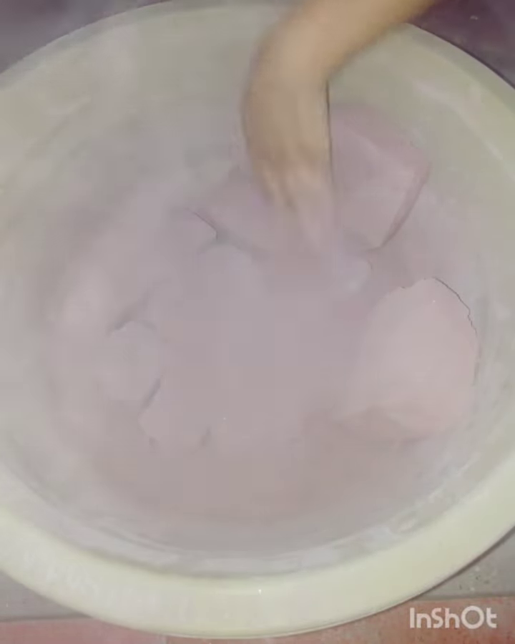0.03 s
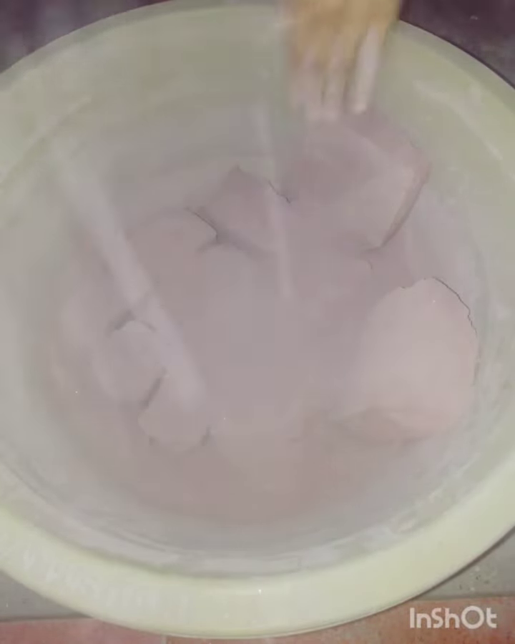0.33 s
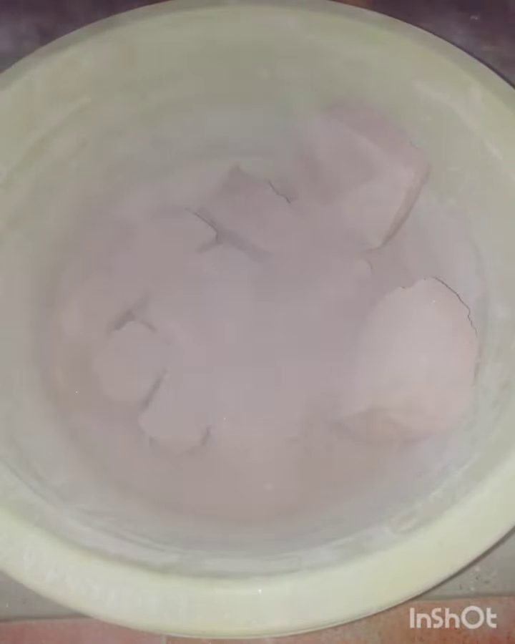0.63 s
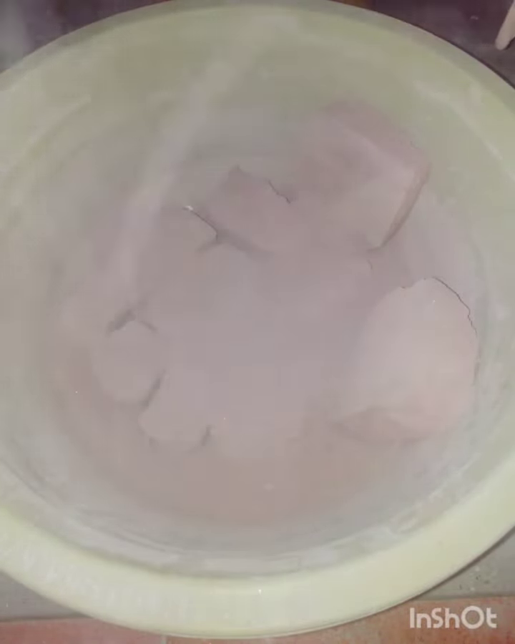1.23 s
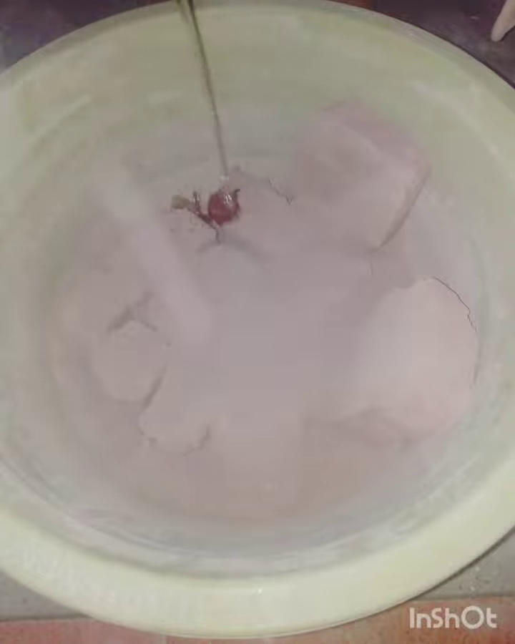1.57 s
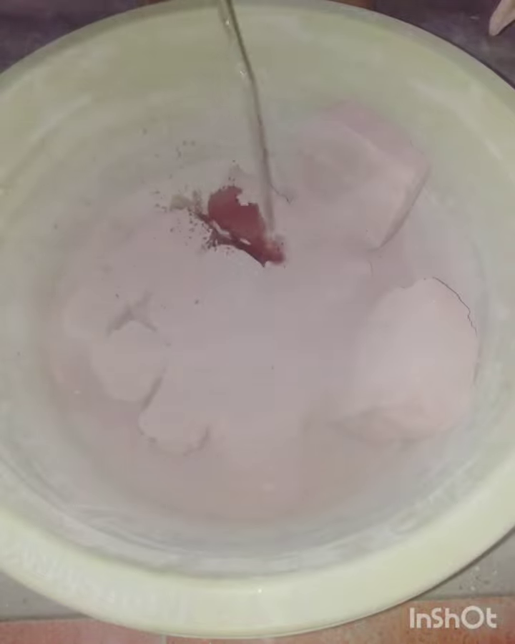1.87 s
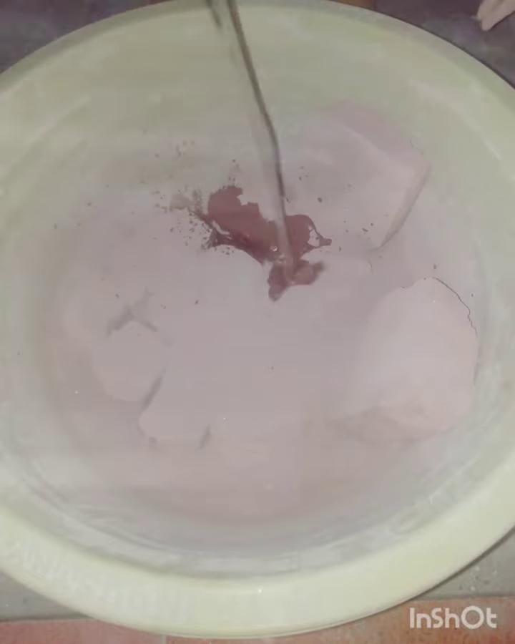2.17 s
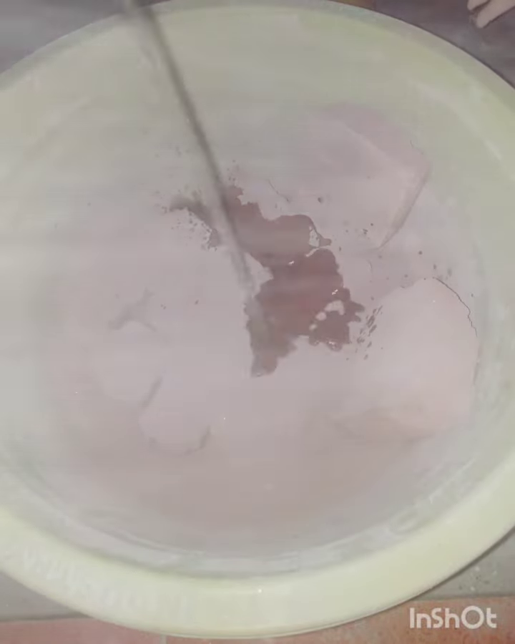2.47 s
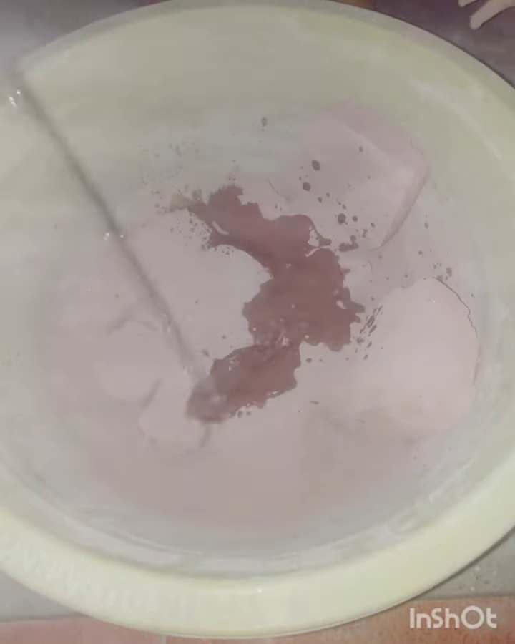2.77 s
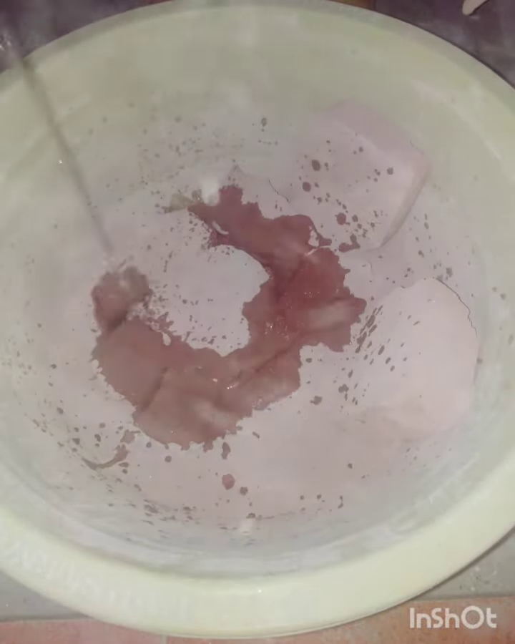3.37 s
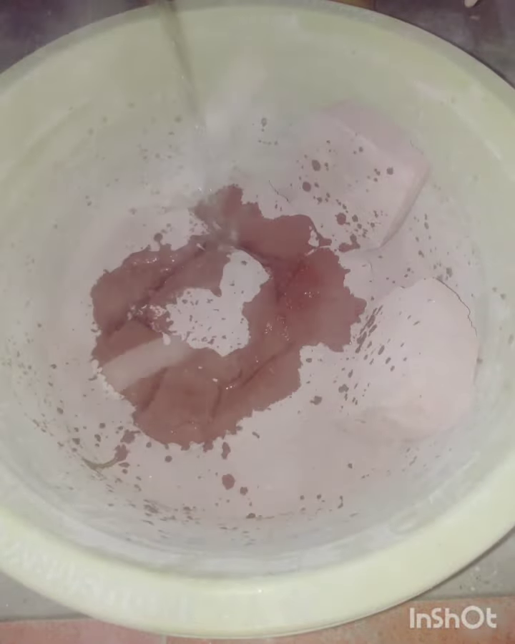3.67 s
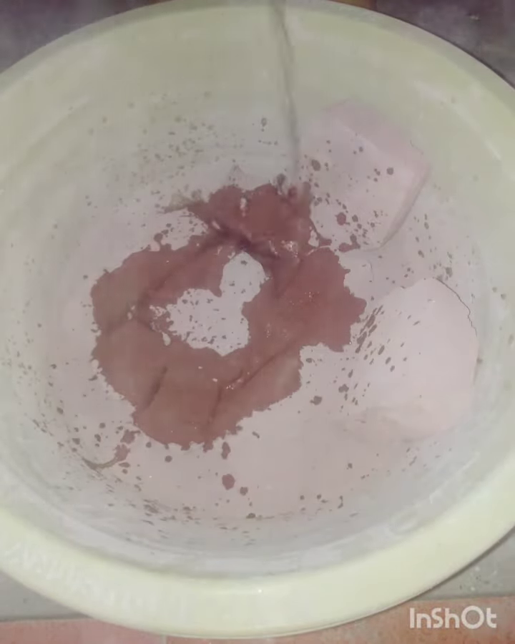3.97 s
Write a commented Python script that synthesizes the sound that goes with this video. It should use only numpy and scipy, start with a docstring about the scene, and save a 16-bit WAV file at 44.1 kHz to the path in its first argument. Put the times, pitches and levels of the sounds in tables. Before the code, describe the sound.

A thin stream of water splatters close by onto dry powder in a plastic tub. A brief brushing and a few light knocks come first, then the pour patters and sputters unevenly over a low room rumble.

```python
"""A room with a steady low rumble; a plastic tub of dry powder stands close to the left microphone port.
Nearby, a hand brushes off powder and a vessel knocks lightly. Then, from about 1.5 s, a thin stream of
water is poured into the tub. It drums dully on the powder, throws a patter of droplets, sputters whenever
it digs into its own puddle and thuds in the heavier gushes. A faint hollow tone passes near the end."""
import sys
import numpy as np
from scipy import signal
from scipy.fft import rfft, irfft, next_fast_len
from scipy.io import wavfile
from scipy.ndimage import map_coordinates

SR = 44100
rng = np.random.default_rng(int(sys.argv[2]) if len(sys.argv) > 2 else 0)


def unload_wav(signal):
    """Save mono or channel-first audio to the path in sys.argv[1] as 16-bit WAV at rate SR, clipped to [-1, 1]."""
    wavfile.write(
        sys.argv[1],
        SR,
        np.round(np.clip(np.atleast_2d(signal).T, -1, 1) * 32767).astype(np.int16),
    )


N = 176400
TOP_HZ = 15950
DROPLET_CYCLES = 6  # a tiny droplet dies away in this many cycles

# How alike diffuse sound is at the two ports: frequency_hz, correlation
PORT_LIKENESS = [(60, 1), (150, 0.91), (300, 0.8), (700, 0.23), (2000, 0), (8000, 0)]
# The room's reverberation: frequency_hz, t60_s
ROOM_DECAY = [(200, 0.088), (2000, 0.32), (6000, 0.25), (14000, 0.15)]


def amp(db):
    return 10 ** (np.asarray(db) / 20)


def unit_rms(x):
    return x / np.sqrt(np.mean(x ** 2) + 1e-20)


def lean_left(x, db):
    """Raise the left channel and lower the right, each by db."""
    return x * amp([[db], [-db]])


def along(points, hz):
    """Read (frequency_hz, value) points on a log frequency axis."""
    point_hz, values = np.transpose(points)
    return np.interp(np.log(hz + 1), np.log(point_hz + 1), values)


def envelope(points):
    """Gain per sample from (time_s, level_db) points, silent before the first."""
    times, db = np.transpose(points)
    return amp(np.interp(np.arange(N) / SR, times, db)) * (np.arange(N) >= times[0] * SR)


def coloured(x, colour, size=16384):
    """Minimum-phase filter through (frequency_hz, gain_db) points."""
    cepstrum = irfft(np.log(amp(along(colour, np.fft.rfftfreq(size, 1 / SR)))))
    cepstrum[1:size // 2] *= 2
    cepstrum[size // 2 + 1:] = 0
    impulse = irfft(np.exp(rfft(cepstrum)))
    return signal.fftconvolve(x, impulse[None, :size // 2], axes=1)[:, :N]


def noise(colour):
    """Coloured stereo noise of rms 1, alike at both ports in the bass and independent in the treble."""
    hz = np.fft.rfftfreq(N, 1 / SR)
    width = np.arccos(np.clip(along(PORT_LIKENESS, hz), -1, 1)) / 2
    spectrum = rfft(rng.standard_normal((2, N))) * amp(along(colour, hz))
    mid, side = irfft(spectrum * [np.cos(width), np.sin(width)], N)
    return unit_rms(np.array([mid + side, mid - side]))


def add(out, start_s, x):
    """Mix x into out from start_s on."""
    i = min(N, max(0, round(start_s * SR)))
    out[:, i:i + x.shape[-1]] += x[..., :N - i]


def pings(starts, hz, gain, cycles, rise=0.013, size=300, lead_s=0.000297):
    """Slightly rising tones that fall 60 dB in so many cycles; each reaches the left port first."""
    right_starts = starts + lead_s * rng.uniform(0.26, 1.66, len(starts))
    ports = []
    for arrival in (starts, right_starts):
        samples = np.ceil(arrival * SR).astype(int)[:, None] + np.arange(size)
        turns = (samples / SR - arrival[:, None]) * hz[:, None]
        shape = (1 - np.exp(-turns)) * 1000 ** (-turns / cycles)
        tones = gain[:, None] * shape * np.sin(2 * np.pi * turns * (1 + rise * turns / cycles / 2))
        ports.append(np.bincount(samples.ravel(), tones.ravel(), N)[:N])
    return np.array(ports)


def grain_gains(count, spread_db):
    """Many small grains and a few large ones."""
    return amp(spread_db * np.minimum(rng.exponential(size=count), 3.5))


def echo(x, decay, stretches):
    """Diffuse reflections, with a fresh tail for each stretch of time as the source moves."""
    out = np.zeros((2, N))
    for k, part in enumerate(np.array_split(x, stretches)):
        hz, t, spectra = signal.stft(rng.standard_normal((2, SR // 4)), SR, nperseg=128)
        tail = signal.istft(spectra * amp(-60 * t / along(decay, hz)[:, None]), SR, nperseg=128)[1]
        tail = np.pad(tail / np.linalg.norm(tail[0]), ((0, 0), (SR // 700, 0)))  # 1.4 ms late
        add(out, k * N / stretches / SR, signal.fftconvolve(part[None], tail, axes=1))
    return out


def room(hum_hz=75.4, hum_db=-46.5, rumble_db=-42.5):
    """The room tone: a low rumble with a faint hum."""
    # Spectrum of the rumble: frequency_hz, gain_db
    rumble_colour = [(15, -66), (25, -34), (59, -4.5), (107, 2), (170, -11.5), (200, -14), (228, -17),
                     (261, -15), (299, -14.5), (352, -27), (437, -21.5), (513, -29.5), (557, -24),
                     (1090, -41), (1180, -39), (1930, -44), (4210, -47.5), (5520, -55.5), (15800, -65)]
    hum = amp(hum_db) * np.sin(2 * np.pi * (hum_hz * np.arange(N) / SR + rng.random()))
    return lean_left(amp(rumble_db) * noise(rumble_colour) + hum, db=0.58)


def vessel_knocks(pivot_hz=2000, clack_t60_s=0.036):
    """Each light knock is a short clack that sets the vessel ringing; the room answers."""
    # Knocks on the vessel: start_s, level_db, tilt_db_per_octave
    knocks = [(.07, -47, 4), (.19, -24.5, 0.5), (1.097, -52, 3.5), (1.304, -35.5, -2), (1.342, -41, -7.5)]
    # The vessel's resonances: pitch_hz, level_db, t60_s
    modes = [(934, 4, 0.15), (1180, -6, 0.15), (1250, -3, .09), (1600, -7, .1), (1900, 5, 0.072),
             (2380, 2, 0.11), (3070, -4, 0.12), (3270, 1, 0.13), (3420, -3, .1), (3740, -8, .1)]
    # Spectrum of the clack: frequency_hz, gain_db
    clack_colour = [(500, -16), (800, -8), (950, -2.5), (1200, 9), (1500, -10.5), (1950, -4), (2300, -10),
                    (2900, -3), (3400, -8), (4000, -8), (6500, -20.5), (8700, -13.5), (10000, -50)]
    out, t = np.zeros((2, N)), np.arange(SR // 4) / SR
    for start, db, tilt in knocks:
        ring = np.zeros((2, len(t)))
        for hz, mode_db, t60 in modes:
            fade = amp(mode_db + tilt * np.log2(hz / pivot_hz) - 60 * t / t60)
            ring += fade * np.sin(2 * np.pi * hz * t + rng.uniform(0, np.pi, (2, 1)))
        tilted = [(hz, gain_db + tilt * np.log2(hz / pivot_hz)) for hz, gain_db in clack_colour]
        clack = unit_rms(coloured(rng.standard_normal((2, len(t))), tilted)[:, :len(t)])
        add(out, start, amp(db - 14) * ring / np.abs(ring).max())
        add(out, start, amp(db - 7 - 60 * t / clack_t60_s) * clack)
    return out + amp(-4) * echo(out[0], ROOM_DECAY, stretches=4)


def handling(tick_s=0.336, tick_db=-47.5, tick_t60_s=0.063):
    """Nearby, a hand brushes off powder; the vessel knocks and gives one small dull tick."""
    # The brushing, sinking to a faint hiss that stays: time_s, level_db
    rub_levels = [(0, -51.5), (.06, -55), (.15, -59), (.3, -63), (.45, -65.5)]
    # Spectrum of the brushing: frequency_hz, gain_db
    rub_colour = [(500, 3.5), (1500, -12), (3500, -11), (8000, -15.5), (10500, -27), (15000, -16.5)]
    # Spectrum of the tick: frequency_hz, gain_db
    tick_colour = [(1100, -30), (1850, 2), (2300, -2), (2900, -22), (9000, -36)]
    out = vessel_knocks() + envelope(rub_levels) * noise(rub_colour)
    t = np.arange(SR // 4) / SR
    add(out, tick_s, amp(tick_db - 60 * t / tick_t60_s) * noise(tick_colour)[:, :len(t)])
    return lean_left(out, db=0.5)


def drumming(slap_count=3000, hiss_db=2):
    """The powder takes the stream with a dull murmur and soft, dense slaps of mud."""
    # The stream drumming on the powder: time_s, level_db
    drum_levels = [(1.47, -67), (1.52, -49), (1.62, -54), (1.9, -49.5), (2.15, -47.5), (2.33, -58),
                   (2.48, -47.5), (2.6, -52.5), (2.7, -52), (2.82, -43.5), (2.9, -51.5), (3.02, -46),
                   (3.3, -56), (3.43, -49), (3.65, -51), (3.77, -45.5), (4.0, -49.5)]
    # Spectrum of the drumming: frequency_hz, gain_db
    drum_colour = [(40, -7), (75, 10.5), (110, 9), (200, 5.5), (280, 6), (500, 0), (800, -4.5), (1400, -20),
                   (4000, -80)]
    # Soft splatter of mud: time_s, level_db
    mud_levels = [(1.48, -66), (1.53, -53), (1.6, -69), (1.95, -63.5), (2.12, -47.5), (2.21, -55.5),
                  (2.3, -68), (2.58, -78), (2.68, -46.5), (2.74, -66), (2.8, -45), (2.87, -75), (3.01, -54),
                  (3.08, -58.5), (3.17, -54), (3.35, -69.5), (3.7, -103), (3.96, -49.5)]
    # Spectrum of the splatter: frequency_hz, gain_db
    mud_colour = [(300, -23.5), (800, -10.5), (1500, -4), (2200, -8), (4000, -3), (9000, -28)]
    starts = rng.uniform(0, N / SR, slap_count)
    hz = rng.uniform(370, 2420, slap_count)
    slaps = pings(starts, hz, grain_gains(slap_count, spread_db=3.5), cycles=6.3)
    mud = unit_rms(unit_rms(coloured(slaps, mud_colour)) + amp(hiss_db) * noise(mud_colour))
    return lean_left(envelope(drum_levels) * noise(drum_colour) + envelope(mud_levels) * mud, db=1)


def blobs(per_s=120, spread_db=2):
    """The stream arrives in uneven blobs: a quickly wavering gain of rms 1."""
    position = np.arange(N) * per_s / SR
    blob_sizes = rng.standard_normal(int(position[-1]) + 4)
    return unit_rms(amp(spread_db * map_coordinates(blob_sizes, [position])))


def patter(per_s=750, pitch_hz=7640, pitch_spread=0.29, puff_s=0.0037):
    """Tiny droplets land at random, each a ping with a short puff of spray."""
    # Fine patter of the stream: time_s, level_db
    patter_levels = [(1.49, -74), (1.52, -51), (1.6, -52), (1.69, -39.5), (1.73, -47.5), (1.81, -42.5),
                     (1.85, -38.5), (2.03, -42.5), (2.25, -41.5), (2.42, -41.5), (2.52, -45), (2.66, -42),
                     (2.79, -45), (2.91, -42.5), (3.0, -47), (3.16, -51.5), (3.27, -72), (3.33, -67.5),
                     (3.39, -51.5), (3.46, -45), (3.7, -45.5), (3.8, -39), (3.9, -46), (4.0, -39.5)]
    count = int(per_s * N / SR)
    starts = rng.uniform(0, N / SR, count)
    gain = grain_gains(count, spread_db=4.3)
    hz = np.minimum(pitch_hz * np.exp(pitch_spread * rng.standard_normal(count)), TOP_HZ)
    impact_energy = np.bincount((starts * SR).astype(int), gain ** 2, N)[:N]
    puff_energy = signal.lfilter([1], [1, -np.exp(-1 / (puff_s * SR))], impact_energy)
    spray = unit_rms(np.sqrt(puff_energy) * rng.standard_normal((2, N)))
    droplets = unit_rms(pings(starts, hz, gain, DROPLET_CYCLES))
    return envelope(patter_levels) * (amp(-2) * droplets + amp(-3.5) * spray)


def drops(fragments=9, splat_s=0.0046, early_share=0.3, puff_rise_s=0.0011, delay_s=0.001005):
    """A big drop rings for a few cycles amid its fragments, with a puff of spray."""
    # Big drops landing: start_s, level_db, pitch_hz
    landings = [(1.564, -22, 8400), (1.6236, -22.5, 8500), (1.666, -28, 7400), (1.6825, -23.5, 5400),
                (1.7034, -28.5, 7750), (1.7844, -26, 7300), (1.8347, -23, 7160), (1.8494, -27, 7200),
                (1.8785, -23.5, 5400), (1.9106, -18.5, 6550), (1.9223, -21, 7750), (1.9321, -17.5, 3540),
                (1.962, -19, 5700), (1.967, -19, 3970), (1.9836, -21.5, 6840), (2.0223, -22.5, 7600),
                (2.035, -25.5, 7320), (2.0464, -22.5, 7640), (2.105, -21, 3540), (2.1247, -19, 4740),
                (2.1486, -18.5, 5120), (2.2643, -19.5, 7130), (2.2754, -38, 7000), (2.425, -31, 7800),
                (2.4506, -23.5, 8060), (2.473, -27.5, 6700), (2.4889, -25, 7460), (2.519, -23.5, 6160),
                (2.5413, -27.5, 4530), (2.591, -24, 7050), (2.6152, -20.5, 4900), (2.6575, -18, 5440),
                (2.732, -18, 6650), (2.7522, -18, 7750), (2.7864, -15.5, 6400), (2.7966, -24, 7240),
                (2.812, -26, 7300), (2.87, -26, 6960), (2.8857, -31, 7300), (2.9062, -24.5, 6950),
                (3.061, -24.5, 4820), (3.1526, -24.5, 7300), (3.1893, -36, 7200), (3.247, -47, 7340),
                (3.2636, -39.5, 7200), (3.4312, -29, 5700), (3.4404, -25, 5430), (3.47, -27.5, 9000),
                (3.529, -33, 8100), (3.5626, -23, 7400), (3.6255, -29, 7100), (3.7383, -17.5, 2960),
                (3.749, -12, 5230), (3.7605, -17, 4290), (3.773, -23, 6250), (3.7915, -17.5, 4660),
                (3.8812, -24.5, 8430), (3.922, -23, 6000)]
    out = np.zeros((2, N))
    puff_age = np.arange(SR // 100) / SR / puff_rise_s
    puff = puff_age * np.exp(1 - puff_age)
    for start, db, hz in landings:
        start = start + delay_s
        offsets = splat_s * ((np.arange(fragments) + rng.random(fragments)) / fragments - early_share)
        fragment_hz = hz * np.exp(0.23 * rng.permutation(np.linspace(-1, 1, fragments)))
        fragment_gain = amp(1.5) * np.exp(-2 * np.abs(offsets) / splat_s)
        splat = pings(start + offsets, fragment_hz, fragment_gain, DROPLET_CYCLES)
        splat += pings(np.array([start]), np.array([hz]), np.ones(1), cycles=16.6, size=600)
        out += amp(db - 7) * splat * np.sqrt(splat_s * SR / np.sum(splat[0] ** 2))
        add(out, start - puff_rise_s, amp(db - 19) * puff * rng.standard_normal((2, len(puff))))
    return out


def snaps(droplets=8, pitch_hz=13100, length_s=0.0022):
    """Fine spray bursts in thin, high snaps, each a tight handful of the smallest droplets."""
    # Bursts of spray: start_s, level_db
    bursts = [(1.644, -21), (1.835, -24), (2.018, -22), (2.44, -25), (2.812, -28), (2.851, -20),
              (3.357, -35.5), (3.701, -38), (3.8158, -22.5)]
    out = np.zeros((2, N))
    for start, db in bursts:
        starts = start + length_s * rng.random(droplets)
        hz = pitch_hz * np.exp(rng.uniform(-0.045, 0.14, droplets))
        burst = pings(starts, hz, np.ones(droplets), DROPLET_CYCLES)
        out += amp(db) * burst / np.abs(burst[0]).max()
    return out


def sputters(bubbles_per_s=1000, highest_hz=7950, rise_s=0.006, fade_db=5):
    """The stream beats air into the puddle: fading crowds of little bubbles."""
    # Sputters in the puddle: start_s, length_s, level_db, lowest_hz
    crowds = [(1.686, 0.025, -39, 2290), (1.775, 0.028, -37, 3400), (1.845, 0.058, -36.5, 2970),
              (1.901, 0.066, -33.5, 2400), (2.004, 0.046, -32.5, 2480), (2.084, 0.08, -33, 2230),
              (2.18, 0.054, -35.5, 1880), (2.262, 0.034, -36, 2520), (2.515, 0.044, -36, 3240),
              (2.615, 0.04, -35.5, 3500), (2.66, 0.051, -36.5, 3240), (2.724, 0.05, -33.5, 3800),
              (2.777, 0.036, -33, 2460), (3.044, 0.043, -39.5, 3500), (3.191, .09, -59, 6900),
              (3.518, 0.039, -41, 4040), (3.558, 0.11, -39, 3460), (3.715, 0.029, -32, 2090),
              (3.738, 0.063, -31.5, 2370), (3.921, 0.033, -33.5, 1930)]
    out = np.zeros((2, N))
    for start, length, db, lowest_hz in crowds:
        count = int(bubbles_per_s * length) + 1
        progress = (np.arange(count) + rng.random(count)) / count
        hz = lowest_hz * (highest_hz / lowest_hz) ** (rng.permutation(count) / count)
        shape = amp(-fade_db * progress) * (1 - np.exp(-length * progress / rise_s))
        gain = grain_gains(count, spread_db=4.5) * shape
        crowd = pings(start + length * progress, hz, gain, cycles=8.5)
        out += amp(db) * crowd * np.sqrt(length * SR / np.sum(crowd[0] ** 2))
    return out


def bubbles():
    """A few large bubbles ring on in the puddle, rising in pitch."""
    # Ringing bubbles: start_s, level_db, pitch_hz
    large_bubbles = [(1.914, -19, 2400), (1.939, -17, 2610), (3.725, -17.5, 2410), (3.737, -16.5, 3010),
                     (3.747, -15.5, 2290), (3.778, -21, 4530), (3.944, -17, 1530)]
    starts, db, hz = np.transpose(large_bubbles)
    return pings(starts, hz, amp(db), cycles=58, rise=0.045, size=2000)


def thuds(width_s=0.029):
    """Each heavy gush pushes on the bed of powder with a soft, low swell."""
    # Heavy gushes into the tub: crest_s, level_db
    gushes = [(2.02, -41.5), (2.71, -37.5), (2.81, -37), (3.769, -36.5), (3.85, -43)]
    # Spectrum of a thud: frequency_hz, gain_db
    thud_colour = [(35, -19), (70, 4.5), (110, 3), (170, -4.5), (260, -15), (500, -15), (1200, -43)]
    t = np.arange(N) / SR
    push = sum(amp(db) * np.exp(-((t - crest) / width_s) ** 2) for crest, db in gushes)
    return lean_left(push * noise(thud_colour), db=1)


def hollow_tone(crest_s=3.43, width_s=0.085, pitch_hz=525, bandwidth_hz=14, level_db=-53):
    """A faint hollow tone swells and fades once as the stream picks up again."""
    t = np.arange(N) / SR
    band = np.exp(-((np.fft.rfftfreq(N, 1 / SR) - pitch_hz) / bandwidth_hz) ** 2)
    narrow_noise = irfft(rfft(rng.standard_normal(N)) * band, N)
    tone = np.cos(np.angle(signal.hilbert(narrow_noise)))  # even level, wandering pitch
    return amp(level_db) * np.exp(-((t - crest_s) / width_s) ** 2) * tone


def scene(left_db=4.5, right_db=-5, tub_t60_s=0.0053):
    """The water is heard directly, off the tub's wall and through the room; the right port is shaded."""
    # Spectral shaping of the splashing water: frequency_hz, gain_db
    water_colour = [(300, -31), (1200, -14), (1700, -12), (2300, -6.5), (4500, -2), (7000, 0.5),
                    (7900, 4.5), (9200, -2), (10500, -10), (12500, 0), (15500, 2.5)]
    # Colour of the water at the shaded right port: frequency_hz, gain_db
    right_shade = [(1500, 2.5), (2500, 0), (4500, -.5), (8000, -3.5), (13000, 0)]
    stream = blobs() * (patter() + sputters() + bubbles())
    water = coloured(stream + drops() + snaps(), water_colour)
    tub_echo = amp(-10.5) * echo(water[0], [(TOP_HZ, tub_t60_s)], stretches=30)
    room_echo = amp(-9.5) * echo(water[0], ROOM_DECAY, stretches=10)
    direct = water * amp([[left_db], [right_db]])
    reflected = (tub_echo + room_echo) * amp([[left_db], [left_db - 0.5]])  # nearly even at both ports
    left, right = direct + reflected
    splashing = np.vstack([left, coloured(right[None], right_shade)])
    return splashing + drumming() + thuds() + hollow_tone() + handling() + room()


def record(dry):
    """The recorder keeps nothing above TOP_HZ."""
    size = next_fast_len(N + SR // 2)
    passband = np.fft.rfftfreq(size, 1 / SR) < TOP_HZ
    return irfft(rfft(dry, size) * passband, size)[:, :N]


dry = scene()
out = record(dry)
unload_wav(out)
```